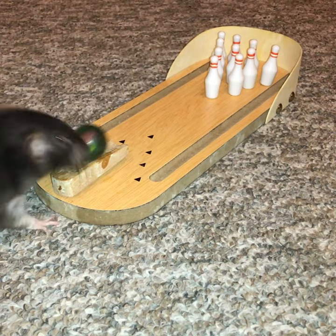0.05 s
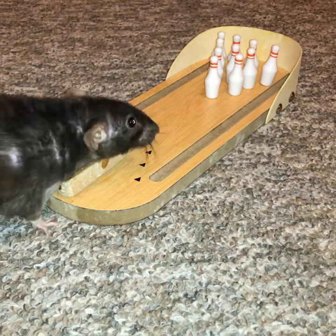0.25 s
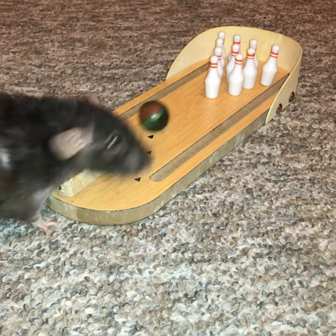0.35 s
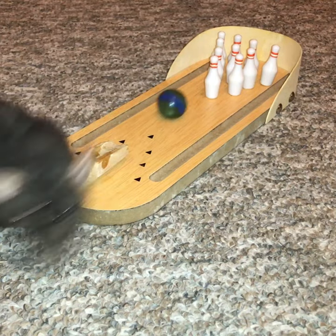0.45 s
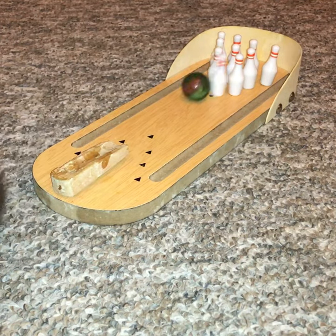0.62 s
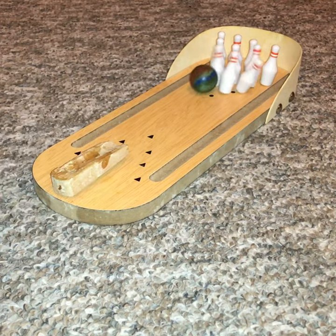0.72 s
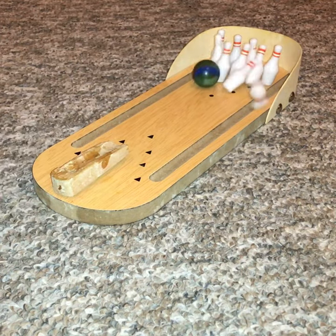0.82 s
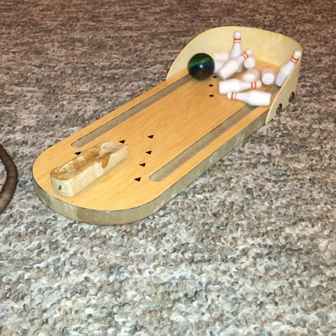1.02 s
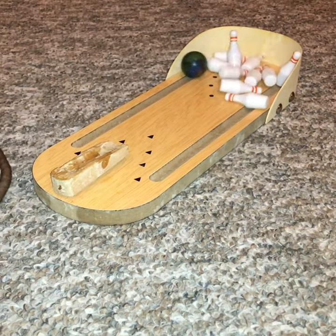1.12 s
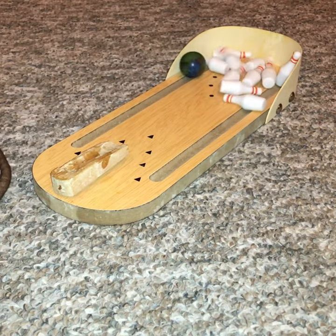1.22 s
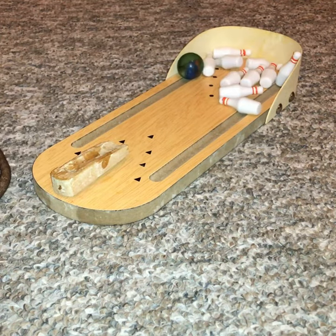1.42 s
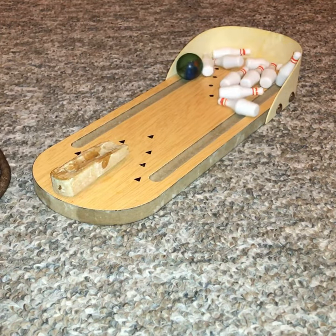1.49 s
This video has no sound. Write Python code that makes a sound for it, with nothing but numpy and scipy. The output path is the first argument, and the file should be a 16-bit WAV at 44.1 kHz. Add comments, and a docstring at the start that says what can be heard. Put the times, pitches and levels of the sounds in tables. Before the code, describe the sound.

Small wooden bowling pins clatter down after a marble bounces and rolls into them.

```python
"""A wooden toy bowling lane on a carpet in a quiet room, heard close through one microphone.
A marble is nudged along a little ramp with a low rustle, drops onto the lane at 0.22 s and bounces
to rest, ringing the board. It rolls over the grain with a few light ticks. At 0.8 s it runs into ten
small wooden pins, which clack against each other, knock on the lane and scrape. They rattle to a
stop by 1.4 s, leaving the room tone and a faint treble hiss."""
import sys
import numpy as np
from scipy import signal
from scipy.fft import rfft, irfft
from scipy.io import wavfile

SR = 44100
rng = np.random.default_rng(int(sys.argv[2]) if len(sys.argv) > 2 else 0)


def pcm_store(signal):
    """Save signal as 16-bit PCM."""
    levels = np.round(np.clip(np.atleast_2d(signal), -1, 1) * 32767)
    wavfile.write(sys.argv[1], SR, levels.astype(np.int16).T)


N = 68355
BLOW_S, RING_S = .006, .15  # attack that sets a hit's level; whole length of a hit
TICK_T60_S, PIN_ROOM_DB = 0.018, -11

# sharp edge of a contact (frequency [Hz], relative density [dB])
TICK_SPECTRUM = [(500, 0), (2500, 10.5), (5200, 7), (6500, -3), (8000, -4), (9200, -1), (10200, -8),
                 (12500, -4), (16000, -17)]
# first echoes off the rim and back wall at the far end of the lane (delay [s], gain)
FAR_ECHOES = [(.001, 0.17), (.0037, 0.13)]


def amp(db):
    """Decibels to gain."""
    return 10 ** (np.asarray(db) / 20)


def unit_rms(x):
    """Scales to an rms of one."""
    return x / np.sqrt(np.mean(x ** 2) + 1e-20)


def unit_attack(x):
    """Scales a hit so that its first milliseconds have an rms of one."""
    return x / np.sqrt(np.mean(x[:int(BLOW_S * SR)] ** 2) + 1e-20)


def read(points, hz):
    """Reads a table on a log-frequency axis."""
    f, value = np.transpose(points)
    return np.interp(np.log(hz + 1), np.log(f), value)


def level(points):
    """A level curve as gain per sample, silent before its first point and held after its last."""
    s, db = np.transpose(points)
    t = np.arange(N) / SR
    return amp(np.interp(t, s, db)) * (t >= s[0])


def colour(x, points):
    """Filters a signal by a spectrum table."""
    hz = np.fft.rfftfreq(len(x), 1 / SR)
    return irfft(rfft(x) * amp(read(points, hz)), len(x))


def add(mix, s, sound):
    """Mixes a sound in at s seconds."""
    part = mix[round(s * SR):][:len(sound)]
    part += sound[:len(part)]


def ring(modes, detune=0, spread_db=0, rise_s=0.00052, damping_spread=0, polarity=1):
    """Damped modes after a blow that takes rise_s to spread through the wood."""
    t = np.arange(int(RING_S * SR)) / SR
    hz, db, t60 = np.transpose(modes)[:, :, None]
    pitch_draw, level_draw, decay_draw = rng.standard_normal((3, len(modes), 1))
    hz = hz * (1 + detune * pitch_draw)
    t60 = t60 * np.exp(damping_spread * decay_draw)
    gain = amp(db + spread_db * level_draw) * np.exp(-np.log(1000) * t / t60)
    sign = polarity ** np.arange(len(modes))[:, None]  # alternating signs spread the attack
    partials = sign * gain * np.sin(2 * np.pi * hz * t)
    return unit_attack((1 - np.exp(-t / rise_s)) * partials.sum(0))


def crack(spectrum, t60):
    """A burst of noise that dies in milliseconds."""
    t = np.arange(int(RING_S * SR)) / SR
    noise = colour(rng.standard_normal(len(t)), spectrum)
    return unit_attack(noise * np.exp(-np.log(1000) * t / t60))


def bumps(per_s, spread_db):
    """Random small impulses of uneven size and sign."""
    size = amp(spread_db * rng.uniform(-0.91, 1, N)) * rng.choice([-1, 1], N)
    return size * (rng.random(N) < per_s / SR)


def room(x, echoes, tail_db, gap_s=.007):
    """The microphone gets the direct sound, any echoes off the lane's walls, then the room's tail."""
    # decay of the tail (frequency [Hz], t60 [s])
    decay = [(150, 1), (500, 0.01), (1400, 0.3262), (3500, 0.11), (8000, 0.41), (15000, 0.2)]
    # colour of the tail (frequency [Hz], relative level [dB])
    spectrum = [(150, -16), (500, 3), (1400, 6), (3500, 6.5), (8000, 5.5), (15000, -1)]
    hz, t, bands = signal.stft(rng.standard_normal(SR // 2), SR, nperseg=256)
    fade = np.exp(-np.log(1000) * t / read(decay, hz)[:, None])
    tail = signal.istft(bands * amp(read(spectrum, hz))[:, None] * fade, SR, nperseg=256)[1]
    response = np.zeros(SR)
    response[0] = 1
    for s, gain in echoes:
        add(response, s, np.array([gain]))
    add(response, gap_s, amp(tail_db) * tail / np.linalg.norm(tail))
    return signal.fftconvolve(x, response / np.linalg.norm(response))[:N]


def room_tone(db=-69):
    """The quiet room: faint steady noise, mostly bass."""
    # background noise (frequency [Hz], relative density [dB])
    spectrum = [(20, -48), (40, -27), (62, 6), (90, -4), (130, 2.5), (220, 1.5), (350, -14.5), (520, -10),
                (1000, -17), (2200, -25), (6000, -28.5), (14000, -33.5), (16000, -53)]
    return amp(db) * unit_rms(colour(rng.standard_normal(N), spectrum))


def nudge():
    """A low rustle while the marble is nudged along the ramp."""
    # strength of the rustle (time [s], level [dB])
    strength = [(0, -68), (.08, -66.5), (.18, -70.5), (.22, -106)]
    # its colour (frequency [Hz], relative density [dB])
    spectrum = [(100, -6.5), (220, -19), (310, -1.5), (390, -5), (500, -20), (1500, -54), (5000, -58)]
    return level(strength) * unit_rms(colour(rng.standard_normal(N), spectrum))


def rolling_ticks(t60=0.0091):
    """The rolling marble makes a few dry ticks that hardly ring the board."""
    # ticks along the lane (time [s], body [dB], edge [dB])
    ticks = [(0.5961, -55, -48.5), (0.6216, -57, -65), (0.652, -56.5, -63.5), (0.6616, -59, -60),
             (0.691, -56, -82), (0.733, -51.5, -63.5), (0.741, -59, -71), (0.7635, -58, -82),
             (0.768, -60, -82)]
    # a tick's body and its bright edge (frequency [Hz], relative density [dB])
    body = [(400, -4), (1500, 0), (2800, 7.5), (4700, 13), (5800, 1), (8000, -25), (16000, -46)]
    edge = [(3000, -1.5), (6000, -2.5), (8000, 3.5), (9300, 3.5), (10500, -14), (16000, -20)]
    out = np.zeros(N)
    for s, body_db, edge_db in ticks:
        add(out, s, amp(body_db) * crack(body, t60) + amp(edge_db) * crack(edge, t60))
    return room(out, echoes=[], tail_db=-16)


def roll():
    """The marble rumbles over the tiny bumps of the wood grain."""
    # strength of the rolling (time [s], level [dB])
    strength = [(.3, -73), (.35, -57.5), (.43, -56.5), (.48, -64), (.6, -59), (.7, -65.5), (.79, -72.5),
                (1.3, -58.5), (1.42, -79.5), (1.55, -92)]
    # its colour (frequency [Hz], relative density [dB])
    spectrum = [(60, -28), (130, 3.5), (210, -6.5), (330, -0.5), (460, 14), (570, -2), (700, 6.5),
                (1200, -10.5), (1500, -1), (1750, -9.5), (2020, -5), (2450, -19), (3200, -4.5),
                (4200, -23.5), (9000, -54)]
    grain = bumps(per_s=2700, spread_db=8.5)
    return level(strength) * unit_rms(colour(grain, spectrum))


def marble():
    """The marble bounces and rolls; softer landings stay longer in contact and sound duller."""
    # landings on the lane (time [s], level [dB], contact time [s], tick [dB])
    bounces = [(0.221, -21.5, 0.00033, -34), (0.2716, -28, 0.00037, -46.5), (.298, -33, 0.00035, -56),
               (0.3143, -38.5, 0.0004, -57), (0.4413, -47, 0.000553, -67), (0.5145, -59.5, 0.00064, -88)]
    # modes of the lane under the marble (frequency [Hz], relative level [dB], t60 [s])
    lane_modes = [(139.1, -11.5, 0.0617), (308, -10, 0.019), (412, -6, 0.04), (481, -16.5, 0.061),
                  (640, -12.5, 0.06), (1028, -6, 0.029), (1545, -1.5, 0.011), (1624, -11.5, 0.039),
                  (1775, -3.5, 0.021), (1970, -5, 0.019), (2340, -0.5, 0.013), (2967, 10, 0.011),
                  (3100, 14, 0.015), (3427, 10, 0.018), (4034, 14, 0.022), (4643, 7, 0.032),
                  (5380, 14.5, 0.015), (6030, 9.5, 0.0087), (7500, 4.5, 0.026), (8660, 1, 0.0071)]
    # first echoes off the rim and back wall at the near end of the lane (delay [s], gain)
    near_echoes = [(.0014, 0.17), (.0028, 0.42), (.0038, 0.41)]
    out = np.zeros(N)
    for s, db, contact_s, tick_db in bounces:
        board = ring(lane_modes, rise_s=0.00045, polarity=-0.99)
        force = np.sin(np.pi * np.arange(0, contact_s, 1 / SR) / contact_s)  # half a sine
        knock = unit_attack(np.convolve(board, force)[:len(board)])
        add(out, s, amp(db) * knock + amp(tick_db) * crack(TICK_SPECTRUM, TICK_T60_S))
    return room(out + roll(), near_echoes, tail_db=-9.5)


def scrape_and_hiss():
    """Wood sliding on wood sticks and slips in tiny ticks; after 1.4 s a faint treble hiss stays."""
    # scraping that peaks in the thick of the tumble, then the faint hiss (time [s], level [dB])
    strength = [(.6, -73.5), (.9, -66.5), (.98, -50), (1.04, -64), (1.1, -65), (1.4, -82), (1.46, -78)]
    ticks = bumps(per_s=1300, spread_db=3)
    return level(strength) * unit_rms(colour(ticks, TICK_SPECTRUM))


def ringing_notes():
    """Some blows leave a single note ringing."""
    # lone modes (time [s], frequency [Hz], level [dB], t60 [s])
    notes = [(.596, 9200, -72, 0.1), (.8127, 9350, -51, 0.042), (.849, 9200, -47.5, 0.03),
             (.8837, 9200, -58, 0.021), (.9835, 9200, -48, 0.035), (.9835, 388, -42, 0.032),
             (.9835, 2037, -37, 0.042), (1.007, 9160, -59, 0.023), (1.0285, 9370, -54, 0.028),
             (1.05, 2000, -41.5, 0.011), (1.1832, 2030, -44.5, 0.0067), (1.2725, 7300, -61, 0.014),
             (1.2746, 1530, -38, 0.024)]
    out = np.zeros(N)
    for s, hz, db, t60 in notes:
        add(out, s, amp(db) * ring([(hz, 0, t60)]))
    return out


def collision(knock_db, clack_db, ring_db, tick_db):
    """One touch knocks the deck, clacks, rings a pin and ticks; the contact point favours some modes."""
    # modes of the deck under a falling pin, of pins clacking together and of a pin bending
    # (frequency [Hz], relative level [dB], t60 [s])
    deck_modes = [(150, -17, 0.055), (401, -6.5, 0.062), (696, -1, 0.027), (851, -3, 0.026),
                  (1015, 1.5, 0.027), (1320, 9.5, 0.0046)]
    clack_modes = [(1214, -14.5, 0.033), (1450, 1, 0.012), (1990, -1.5, 0.016), (2485, 1, 0.017),
                   (2866, -1, 0.019), (3189, 2.5, 0.023), (3413, 3, 0.016), (3500, -18, 0.0078),
                   (4500, 0, 0.01), (4920, -0.5, 0.0088), (5490, -11.5, 0.022), (5460, -36, 0.005)]
    pin_modes = [(4043, 3, 0.015), (4120, -4.5, 0.016), (5120, -6.5, 0.013)]
    touch = dict(spread_db=3.5, damping_spread=.35)
    knock = amp(knock_db) * ring(deck_modes, detune=.011, **touch)
    clack = amp(clack_db) * ring(clack_modes, detune=.025, **touch)
    bending = amp(ring_db) * ring(pin_modes, detune=.011, **touch)
    return knock + clack + bending + amp(tick_db) * crack(TICK_SPECTRUM, TICK_T60_S)


def jostle(pin_count=10, grazes_per_s=540):
    """Every tumbling pin also grazes its neighbours many times, lightly."""
    # rattle between the blows (time [s], level [dB])
    strength = [(.8, -50.5), (.86, -57), (.93, -45), (1.01, -50), (1.06, -43.5), (1.16, -61), (1.22, -52),
                (1.3, -66), (1.36, -57), (1.385, -79)]
    out = np.zeros(N)
    for _ in range(pin_count):
        grazes = bumps(grazes_per_s / pin_count, spread_db=2.0)
        touch = collision(knock_db=-9, clack_db=0, ring_db=-6, tick_db=-12)
        out += signal.oaconvolve(grazes, touch)[:N]
    return level(strength) * unit_rms(out)


def pins(place_count=3):
    """The pins collide on a few places at the far end of the lane, each with its own room tail."""
    # collisions (time [s], knock on the deck [dB], clack [dB], ring of the pin [dB], tick [dB])
    hits = [(0.7971, -55.5, -40, -54, -43.5), (0.8124, -54, -40.5, -47, -45.5),
            (0.821, -78, -63, -45.5, -44), (0.835, -67, -53, -50, -54), (0.844, -51, -38, -38, -72),
            (0.8503, -44.5, -43.5, -39.5, -44.5), (0.8838, -45, -37.5, -35, -40.5),
            (0.9073, -82, -54, -62, -59), (0.9247, -67, -39.5, -56, -50), (0.9263, -48.5, -53, -49, -71),
            (0.9307, -57, -37, -61, -45.5), (0.9555, -49.5, -41.5, -48, -39), (0.9609, -60, -60, -44, -53),
            (0.9703, -55.5, -50, -64, -55), (0.9747, -76, -36, -58, -36.5), (0.9769, -57.5, -61, -58, -64),
            (0.9832, -48.5, -33.5, -27.5, -36), (1.0031, -57, -39.5, -59, -61),
            (1.0082, -57, -40, -47, -44), (1.0124, -65, -38.5, -46, -76), (1.0221, -55, -37, -63, -36.5),
            (1.0352, -56, -36.5, -35.5, -73), (1.0425, -74, -43.5, -37, -50), (1.0492, -55, -39, -45, -63),
            (1.0582, -51, -42, -40, -68), (1.0747, -47, -31.5, -30, -43), (1.0929, -67, -55, -67, -78),
            (1.112, -62, -38, -41, -47), (1.1246, -46, -54, -67, -64), (1.1313, -37, -54, -69, -71),
            (1.135, -60, -32.5, -35.5, -43.5), (1.1509, -53, -42.5, -71, -74),
            (1.1744, -48.5, -35.5, -37.5, -44), (1.1842, -82, -48, -69, -74),
            (1.1955, -87, -40.5, -57, -61), (1.2011, -53, -39, -42, -48), (1.21, -40.5, -47, -52, -76),
            (1.2253, -47.5, -36.5, -71, -46.5), (1.2374, -81.5, -41.5, -34.5, -49),
            (1.2517, -74, -52, -43, -51), (1.2648, -46, -38.5, -39.5, -43), (1.272, -46.5, -48, -69, -43.5),
            (1.2947, -68, -45, -41.5, -61), (1.3088, -46, -45, -43, -76), (1.3229, -59, -47, -44, -89),
            (1.3379, -52, -55, -56, -82), (1.3538, -52, -53, -70, -85), (1.365, -73, -58, -58, -77),
            (1.379, -59.5, -60, -69, -78)]
    places = np.zeros((place_count, N))
    for k, (s, *levels) in enumerate(hits):
        add(places[k % place_count], s, collision(*levels))
    return sum(room(place, FAR_ECHOES, PIN_ROOM_DB) for place in places)


def scene():
    """Marble and pins over the room tone, in mono."""
    background = room_tone()
    game = nudge() + marble() + rolling_ticks() + pins()
    game += room(jostle() + ringing_notes(), FAR_ECHOES, PIN_ROOM_DB) + scrape_and_hiss()
    # takes the deep bass out of the knocks and the rustle
    low_cut = signal.butter(4, 125, "high", fs=SR, output="sos")
    return (signal.sosfilt(low_cut, game) + background)[None]


def record(dry):
    """The recorder's band limit."""
    low_pass = signal.firwin(511, cutoff=15900, window=("kaiser", 9), fs=SR)
    return signal.oaconvolve(dry, low_pass[None], "same")


dry = scene()
out = record(dry)
pcm_store(out)
```